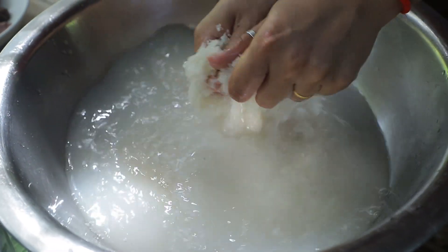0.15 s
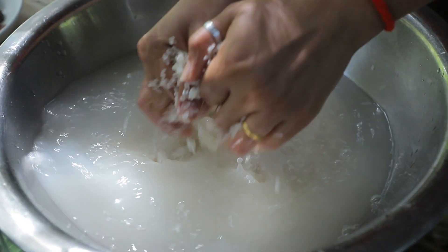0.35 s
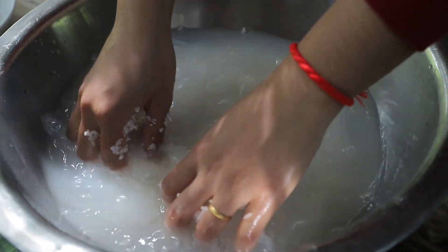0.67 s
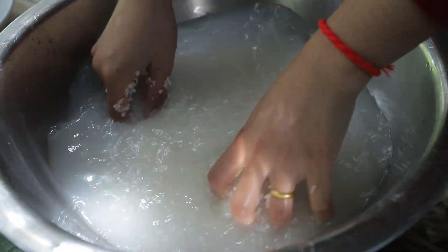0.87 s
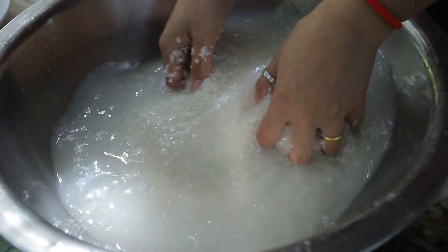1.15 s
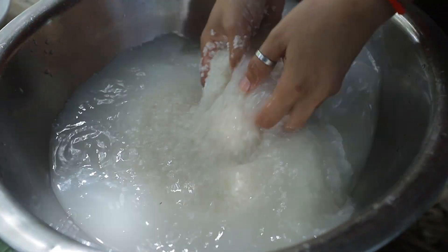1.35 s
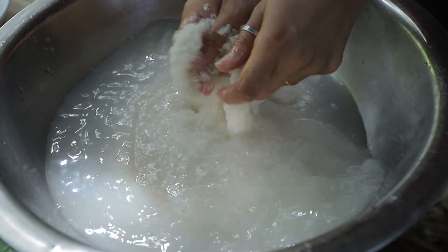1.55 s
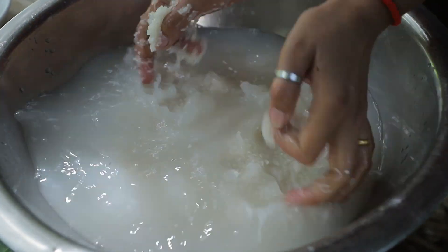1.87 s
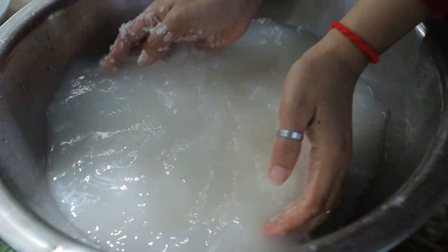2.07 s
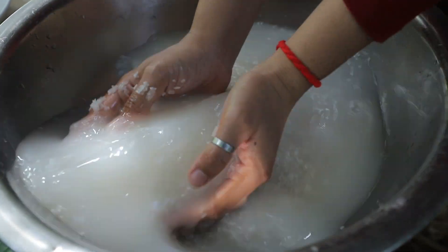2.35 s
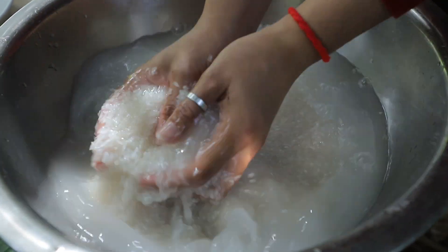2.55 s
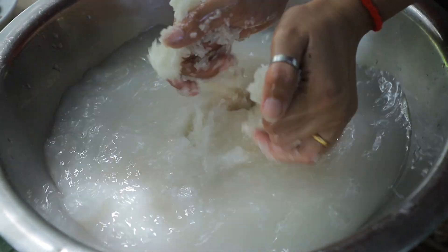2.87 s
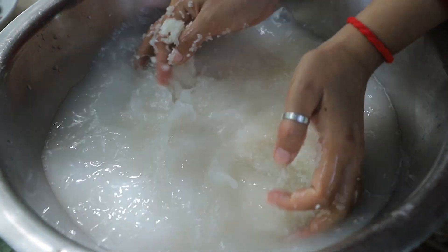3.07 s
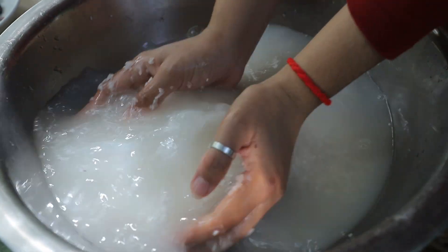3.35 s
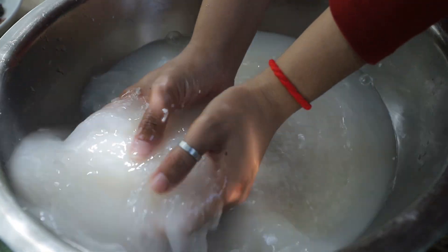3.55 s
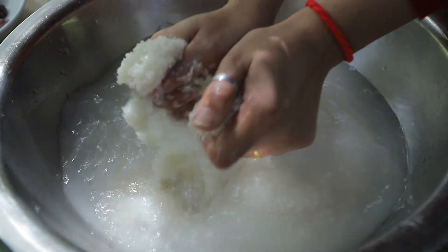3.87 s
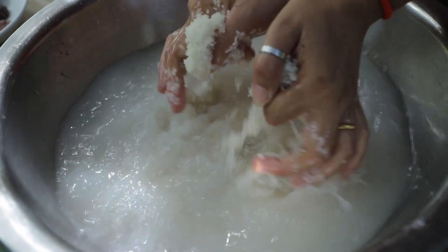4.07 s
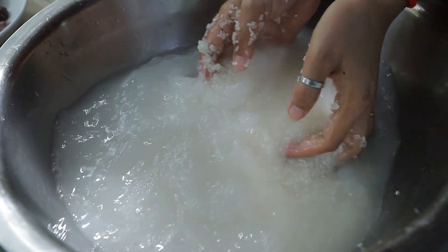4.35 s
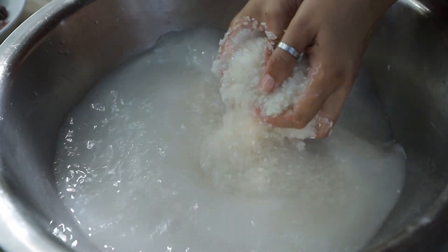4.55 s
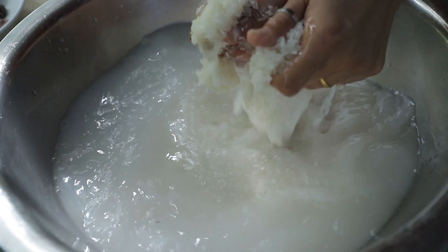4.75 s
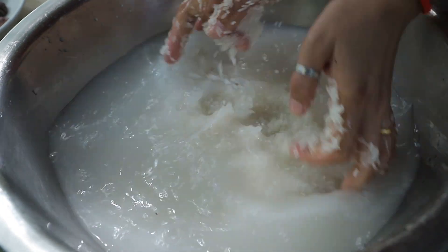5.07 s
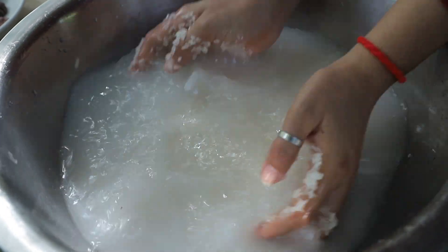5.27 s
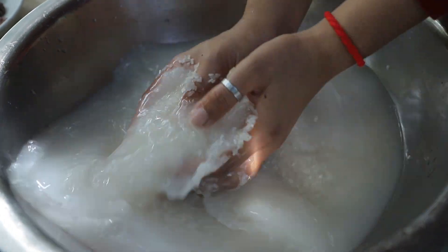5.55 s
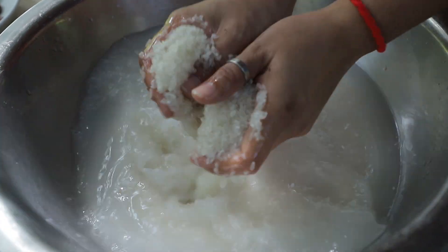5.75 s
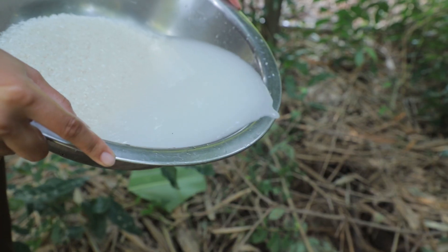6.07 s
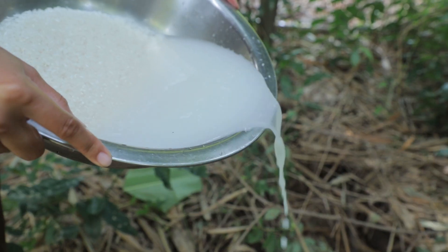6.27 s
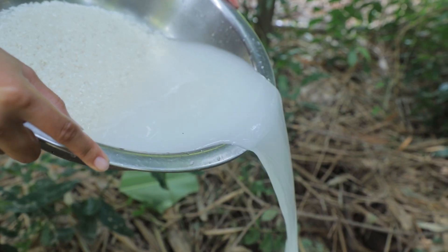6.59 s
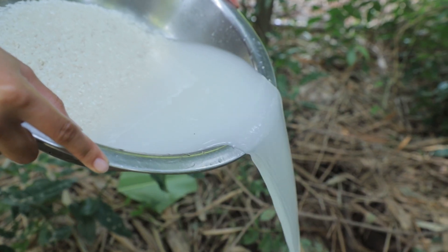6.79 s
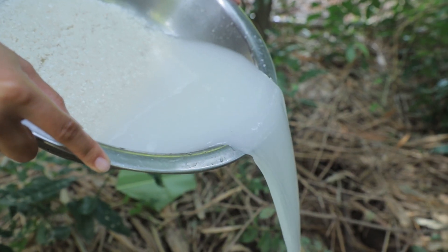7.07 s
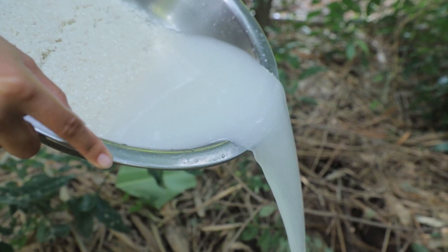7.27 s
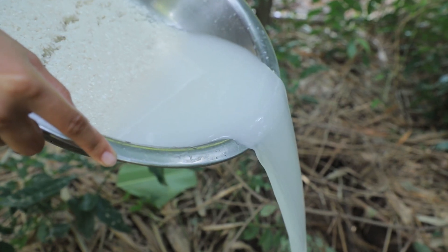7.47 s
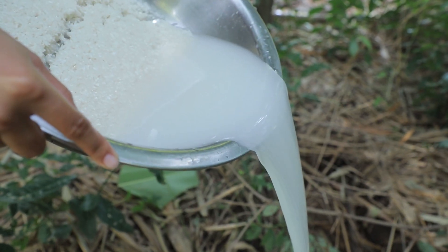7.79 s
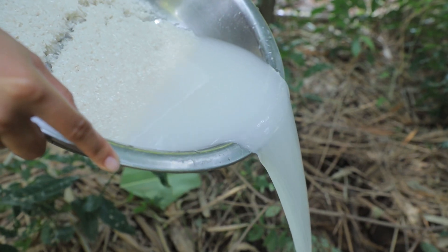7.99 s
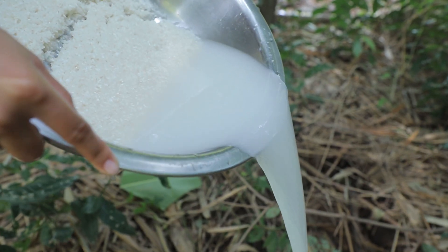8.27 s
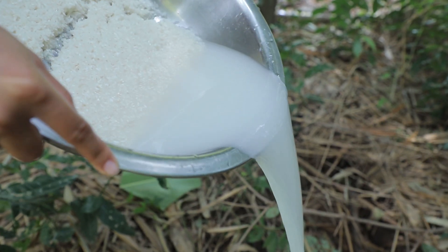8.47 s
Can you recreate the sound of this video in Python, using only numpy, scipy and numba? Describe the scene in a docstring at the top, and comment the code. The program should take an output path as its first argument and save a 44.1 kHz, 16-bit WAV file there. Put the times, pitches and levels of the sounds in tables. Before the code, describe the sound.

A close outdoor microphone hears hands washing raw rice in a metal bowl over airy hiss. From 0 to 0.8 s, gritty swishes and sharp watery snaps burst out, then settle to light rocking water. Another swish starts near 1.45 s, with a clear bubble plop at 1.55; churning continues through 2 s, with clustered bubbles around 2.6 and a strong splash near 3.1. The bowl gets a faint knock at 3.2 and a firmer, dull one at 3.65, amid plops and gurgles. Squeezing swishes follow at 4 and strongly around 5.1, easing before a last stir near 5.8. Low wind puffs bump the microphone from 3.2, strongest around 5 to 5.5. At 6 s there is a tiny near-silent gap, then a faint insect chirp. Pouring starts almost inaudibly, thickens from 6.7, and runs steadily on dry leaves until 8.6, with small drips, a brief distant low drone around 7 to 8 and softer gusts.

```python
"""Outdoors, hands stir and squeeze raw rice in a metal bowl of water, then pour the rinse water onto dry leaves.
Swishes are crowds of gliding bubble grains, clicks and band-passed spatter; single bubbles and smacks sit on top.
Two knocks ring the bowl's modes. After a brief near-silent cut the same water layers play the pour and one chirp.
Behind lie coloured air noise, gusts of low noise in puffs and a low drone; a microphone housing colours
the water, bubbles and air with peaks near 1.3, 3 and 5 kHz."""
import sys
import numpy as np
from scipy import signal
from scipy.fft import rfft, irfft
from scipy.io import wavfile
from scipy.ndimage import uniform_filter1d
from numba import njit

SR = 44100
rng = np.random.default_rng(int(sys.argv[2]) if len(sys.argv) > 2 else 0)


def inscribe(sig):
    """Save sig as 16-bit PCM at rate SR to the path in sys.argv[1].

    A 1-D sig is mono; a 2-D sig holds one channel per row.
    Samples are clipped to [-1, 1] before scaling.
    """
    pcm = np.round(np.clip(np.atleast_2d(sig).T, -1, 1) * 32767)
    wavfile.write(sys.argv[1], SR, pcm.astype(np.int16))


N = 380571  # length in samples

# The gap between stirring and pouring. The row: start in seconds, end in seconds.
CUT_S = (5.9886, 6.0206)
CUT_START_S, CUT_END_S = CUT_S

# Open air noise. Each row: frequency in Hz, relative level in dB per Hz.
AIR_SPECTRUM = [(25, 11.5), (60, 13), (110, 12), (200, 4), (500, 5.5), (1500, -6), (3000, -4),
                (5000, -13.5), (9000, -7.5), (15000, -24)]
AIR_DB = -42.5  # rms
# Colour of the microphone housing. Each row: frequency in Hz, gain in dB.
HOUSING = [(90, -18.5), (200, -16.5), (630, -17), (1050, -8.5), (1280, -1.5), (1480, -9), (1800, -14),
           (2900, -4), (4050, -3.5), (4800, 0), (5800, -3.5), (6800, -13.5), (10300, -17.5), (15500, -19)]
# A distant low drone that swells. The row: full level from in seconds, held in seconds, 10 dB rise in seconds,
# 10 dB fall in seconds, level in dB.
DRONE = (7, 1.1, 0.1, 0.3, -51)

# Gusts on the microphone. Each row: full level from in seconds, held in seconds, 10 dB rise in seconds,
# rumble in dB, flutter over rumble in dB. Signs of the times are ignored.
GUSTS = [(3.24, .02, 0.35, -38.5, -11.5), (3.5, .58, -0.1, -40, 1.5), (4.16, 0.14, -0.26, -32, -0.5),
         (4.45, .5, 0.5, -42.5, -0.5), (5.08, 0.041, 0.15, -29.5, 1.5), (5.42, 0.041, 0.08, -27.5, -1.5),
         (5.66, 0.33, -1.1, -32.5, -9.5), (7.55, .1, 0.23, -35, -18), (7.97, 0.11, 0.3, -35, -20)]
GUST_FALL_S = 0.084  # per 10 dB
# Light wind between gusts. The row: rumble in dB, flutter over rumble in dB.
BREEZE = (-61.5, 0.85)

# One faint chirp. The row: start in seconds, end in seconds, pitch in Hz, peak in dB.
CRICKET = (6.135, 6.235, 9550, -53)

# Modes of the water-damped bowl. Each row: pitch in Hz, level over the knock in dB, free 60 dB decay in seconds.
BOWL_MODES = [(345, -4, .08), (735, 0, .05), (1045, -5, .8)]
# Knuckles meet the bowl. Each row: time in seconds, level in dB, longest 60 dB decay under the hand in seconds.
KNOCKS = [(3.2214, -35, 0.89), (3.656, -24, .06)]

# Drops and grains that smack. Each row: time in seconds, body peak in dB, nominal pitch in Hz,
# bright spit over body peak in dB.
SMACKS = [(0.102, -21, 4170, -14), (0.1675, -16, 4400, -27), (0.316, -16, 6200, -28),
          (0.42, -11.5, 5670, -4), (0.471, -8.5, 4160, 3), (0.5324, -13.5, 4740, 1.5),
          (0.667, -9, 4460, -23), (0.691, -12.5, 4810, -3), (0.7484, -15.5, 4320, -23),
          (1.4516, -23, 7400, -9), (1.4628, -11.5, 4680, -6), (1.7233, -8.5, 6560, -10),
          (1.789, -10, 4400, -17), (1.869, -17, 7100, -20), (1.9706, -6, 5270, -11),
          (2.0028, -14.5, 5700, -14), (2.06, -7, 4620, -3), (2.149, -10.5, 5670, -10),
          (2.459, -19.5, 4700, -17.5), (2.632, -11.5, 7960, -23), (2.8581, -10.5, 3470, -18),
          (2.967, -16, 5040, 2.5), (2.995, -17, 4720, 2), (3.011, -4.5, 4900, -27), (3.068, -12, 5500, -13),
          (3.0778, -5, 5600, -5), (3.1124, -25, 5340, -26), (3.122, -8.5, 5760, -9),
          (3.1697, -11, 3850, -19), (3.197, -4, 5200, -19), (3.295, -12, 4470, -23),
          (3.3274, -11.5, 6270, -13), (3.37, -10, 5160, -8), (3.6267, -15.5, 7600, -14.5),
          (3.686, -17, 2700, -20), (3.7092, -10, 4930, -2.5), (4.02, -18, 4800, 1), (4.0624, -30, 6410, -5),
          (4.13, -8, 5760, -24), (4.157, -20, 4580, 5), (4.2455, -13.5, 8150, -1),
          (4.328, -4.5, 6140, -24.5), (4.9553, -9, 3580, 7), (5.036, -6, 3480, -5), (5.045, -16, 3830, -14),
          (5.063, -6, 5070, -0.5), (5.0926, -10, 4090, -14), (5.1617, -5, 6150, -6),
          (5.2355, -2, 5260, -22), (5.2638, -7.5, 5000, -8), (5.7375, -15, 4770, 7),
          (5.849, -11, 5130, -27), (6.4804, -30.5, 3580, -2), (6.6662, -28.5, 3590, -21),
          (6.7351, -22.5, 5060, -21), (7.0527, -17, 5130, -21), (8.023, -20, 4200, -20),
          (8.0747, -18, 4330, -24), (8.084, -15, 4870, -20), (8.219, -18.5, 4700, -20),
          (8.2585, -19, 5640, 1), (8.303, -17.5, 4500, -15), (8.355, -18, 4800, -15),
          (8.377, -22, 3300, -15), (8.5679, -22.5, 5030, 4)]
# Single bubbles. Each row: start in seconds, start pitch in Hz, pitch ratio after one length, length in ms,
# nominal peak as heard in dB.
BUBBLES = [(0.289, 2820, 1.02, 2.3, -20.5), (0.4096, 3400, 0.93, 2.6, -17.5), (0.435, 3030, 0.84, 2.5, -13),
           (0.442, 1264, 0.97, 2.9, -13.5), (0.4666, 3010, 1.02, 9.7, -19), (0.479, 960, 0.94, 8, -29.5),
           (0.573, 2800, 1.02, 2.8, -19.5), (0.6025, 996, 0.88, 4.7, -21), (0.668, 2300, 1.04, 4.8, -21.5),
           (1.4534, 1360, 0.99, 5, -21), (1.55, 1185, 0.99, 6.8, -2.5), (1.5664, 796, 1.24, 10.7, -22.5),
           (1.5863, 3010, 0.97, 3, -19.5), (1.617, 868, 1.06, 13, -30.5), (1.8162, 3860, 1.1, 4.4, -18),
           (1.8307, 3170, 1.03, 3.7, -15.5), (1.94, 1434, 1.16, 8.4, -28), (2.075, 1330, 1.07, 4.6, -21.5),
           (2.155, 2760, 1.08, 4.4, -20.5), (2.187, 3020, 1.06, 3, -5.5), (2.219, 3360, 0.96, 3.3, -19),
           (2.32, 1260, 1.1, 9.1, -30), (2.455, 2340, 1, 3.8, -27), (2.567, 1350, 1.2, 5.1, -28),
           (2.6162, 1007, 1.11, 6, -7.5), (2.629, 1310, 1.02, 2.7, -6.5), (2.637, 1345, 1.04, 5.8, -25),
           (2.648, 2750, 0.93, 7.5, -15), (2.649, 1070, 1, 4.5, -10.5), (2.658, 1146, 1.04, 12, -22),
           (2.7166, 3350, 0.97, 2.3, -15), (2.7298, 1285, 1.03, 4.8, -7), (2.7335, 821, 1.12, 18.5, -22.5),
           (2.735, 2280, 1.1, 6.2, -24), (2.771, 822, 1.11, 17.5, -17.5), (2.821, 1200, 1.07, 4.5, -24),
           (2.851, 1200, 0.92, 5, -20), (2.868, 940, 1.23, 7.5, -27.5), (2.896, 1290, 1.12, 4, -23),
           (3.0455, 1850, 1.01, 3, -14.5), (3.2194, 941, 1.18, 11.8, -9), (3.241, 1580, 0.94, 2.8, -16.5),
           (3.326, 1274, 0.98, 9, -24.5), (3.3687, 2760, 0.99, 2.8, -17.5), (3.482, 1290, 0.97, 6.4, -22.5),
           (3.6855, 1450, 1.3, 6.5, -26), (3.6973, 2550, 0.88, 5.3, -16.5),
           (3.7064, 2710, 1.01, 4.6, -10.5), (3.7072, 1280, 1.09, 7, -11), (3.7073, 992, 1.06, 13.5, -15.5),
           (3.728, 1310, 1.04, 23, -23), (3.748, 965, 1.2, 9.4, -21), (3.7578, 1190, 1.07, 9.8, -18.5),
           (3.784, 1000, 1.01, 8, -23), (3.788, 1360, 0.97, 9.4, -19), (3.8028, 870, 1.05, 6.2, -21),
           (3.805, 1250, 0.98, 4.9, -18), (3.8371, 1190, 0.93, 4.6, -8), (3.862, 516, 1.36, 20, -29.5),
           (3.864, 803, 1.15, 13.7, -25), (3.918, 1045, 1.07, 6.5, -23.5), (3.969, 1316, 0.94, 9.3, -18),
           (4.0638, 2940, 1.0, 4.6, -19.5), (4.2112, 3120, 0.92, 2.6, -6.5), (4.2124, 3430, 1.09, 5.4, -17),
           (4.2326, 2340, 0.97, 2.4, -15), (4.3235, 2930, 0.84, 5.2, -19.5),
           (4.3305, 1840, 1.03, 3.4, -17.5), (4.519, 1325, 0.97, 5.5, -24.5),
           (4.7097, 703, 1.23, 11.4, -20.5), (4.7216, 1630, 1.08, 8.2, -22), (4.9537, 3670, 0.91, 3.9, -16),
           (5.061, 2274, 0.96, 4.8, -14), (5.1437, 2050, 0.95, 7.3, -17), (5.1574, 3090, 0.99, 4.8, -11.5),
           (5.1825, 2120, 1.16, 2.7, -16), (5.1882, 4300, 0.96, 4.7, -15.5),
           (5.2255, 1691, 0.99, 1.9, -16.5), (5.235, 3220, 0.95, 1.8, -14), (5.241, 2590, 1.07, 2.8, -12),
           (5.262, 1355, 1.06, 8.5, -21.5), (5.6607, 1375, 0.93, 8.5, -18), (5.698, 1310, 0.97, 8, -32),
           (5.728, 2900, 1.03, 4, -20), (5.738, 3040, 0.91, 4.4, -18.5), (5.765, 2650, 1.05, 8.2, -21),
           (5.788, 1480, 0.99, 7, -28), (5.82, 1160, 0.83, 7.9, -30), (5.868, 2420, 1.07, 8, -25),
           (5.8863, 1327, 1.1, 12, -21.5), (5.9116, 3880, 1.03, 4.8, -24), (6.64, 400, 0.92, 23, -43.5),
           (6.781, 2440, 0.7, 9.2, -34)]
BUBBLE_ROUGH = 0.16  # rms depth to which the churning surface shakes a bubble's ring
ECHO_DB, ECHO_T60_S = -12.5, 0.087  # sound scatters between the water and the bowl's wall

# Hands lift, squeeze and plunge the rice. Each row: full level from in seconds, held in seconds,
# 10 dB rise in seconds, 10 dB fall in seconds, fizz in dB, spray over fizz in dB, gurgle in dB.
# Signs of the times are ignored; fizz levels here and below are set before a common lift.
SWISHES = [(0.16, 0.24, 3, 0.8, -42.5, 2, -55), (0.45, 0.035, -0.17, 0.13, -29, -3, -40),
           (0.6, 0.092, -0.2, 0.12, -31, -5.5, -51), (1.46, 0.01, 0.25, -0.6, -37, -12, -45),
           (1.58, .03, -0.2, 0.7, -37, -24, -44.5), (1.74, 0.19, 0.07, -0.11, -33, 1.5, -48),
           (1.96, 0.11, -0.08, 0.37, -32, -1.5, -59), (2.62, 0.14, 0.07, 0.17, -30, -6.5, -37),
           (3.0, 0.074, 0.07, 0.12, -27.5, -2.5, -49), (3.179, 0.022, -0.04, 0, -23, 0, -50),
           (3.25, 0.085, 0.33, 0.16, -35, -7, -46), (3.489, 0.011, 0, -0.4, -36.5, -9.5, -48),
           (3.703, 0.09, -0.15, 0.16, -27.5, -17, -35.5), (3.8, 0.15, -0.44, 0.24, -38, 0, -38),
           (4.03, 0.32, 0, 0.05, -33, 1, -60), (4.4, 0.14, 1.3, 0.9, -37.5, -11.5, -51),
           (5.04, 0.17, 0.18, 0.16, -26, -2, -38.5), (5.731, 0.055, 0.26, 0, -36.5, -15, -39),
           (5.85, 0.094, 0.45, 0, -34.5, -4.5, -41)]
# Water rocking between swishes. The row: fizz in dB, spray over fizz in dB, gurgle in dB.
SETTLING = (-43.5, -11, -50.5)
# The poured stream thickens and lands on leaves. Each row: time in seconds, fizz in dB, spray over fizz in dB,
# gurgle in dB.
POUR = [(6.02, -54, -8, -50), (6.63, -58.5, 4, -45.5), (6.76, -45, -3, -44.5), (6.87, -43, -4, -49),
        (6.91, -39, -1, -42), (7.13, -36.5, -0.5, -36.5), (7.22, -41.5, 2, -41.5),
        (7.38, -38.5, 1.5, -35.5), (7.67, -38.5, -2, -40), (8.62, -37, -0.5, -38)]
# How lumpy the water sounds, as factors on grain scatter. The row: settling, stirred with rice, smooth poured sheet.
GRIT = (0.67, 1, 0.58)
FIZZ_LIFT_DB = 0.5  # raises fizz and spray alike
POUR_BUBBLES_DB = -3.5  # the poured sheet traps less air than stirring hands

EDGE_HZ, TOP_HZ = 15750, 16750  # where the treble steps down, and where it ends


def undb(db):
    """Gain of a level in dB."""
    return 10 ** (np.asarray(db) / 20)


def level(x, db):
    """Scaled to an rms level in dB."""
    return x * undb(db) / np.sqrt(np.mean(x ** 2))


def band(x, lo_hz, hi_hz, order=2):
    """Band-pass."""
    return signal.sosfilt(signal.butter(order, [lo_hz, min(hi_hz, .45 * SR)], "band", fs=SR, output="sos"), x)


def read_spectrum(table, hz):
    """dB of a spectrum table at given frequencies, straight lines over log frequency."""
    at_hz, db = np.transpose(table)
    return np.interp(np.log(hz), np.log(at_hz), db)


def colour(x, table):
    """Minimum-phase filter with the gain of a spectrum table, so nothing rings early."""
    size = 2048
    hz = np.maximum(np.arange(size // 2 + 1), 1) * SR / size
    cepstrum = irfft(np.log(undb(read_spectrum(table, hz))))
    # folding the cepstrum onto positive time makes the filter causal
    cepstrum[1:size // 2] *= 2
    cepstrum[size // 2 + 1:] = 0
    impulse = irfft(np.exp(rfft(cepstrum)))
    return signal.fftconvolve(x, impulse)[:N]


def swells(start, hold, rise, fall):
    """Power envelopes, one per event: rise, hold, fall, each kept to its own side of the cut."""
    t = np.arange(0, N, 32) / SR  # a coarse grid is enough
    start = np.reshape(start, (-1, 1))
    hold, rise, fall = (np.reshape(np.abs(v), (-1, 1)) for v in (hold, rise, fall))
    before = (start - t) / rise
    after = (t - start - hold) / fall
    tens_of_db_down = np.maximum(np.maximum(before, after), 0)
    same_side = (start < CUT_END_S) == (t < CUT_END_S)
    return 10 ** -tens_of_db_down * same_side


def total_db(shapes, db, rest_db):
    """Level at every sample of events that add in power over a resting level."""
    power = undb(db) ** 2 @ shapes + undb(rest_db) ** 2
    return np.interp(np.arange(N), np.linspace(0, N, len(power)), 10 * np.log10(power))


def open_air():
    """Steady broadband air: coloured noise heard through the housing."""
    noise = colour(rng.standard_normal(N), AIR_SPECTRUM)
    return level(colour(noise, HOUSING), AIR_DB)


def drone():
    """A far, low band of noise that swells during the pour."""
    *shape, db = DRONE
    noise = level(band(rng.standard_normal(N), 110, 540), 0)
    return undb(total_db(swells(*shape), [db], db - 30)) * noise


def gusts():
    """Rumble level and flutter over rumble: gusts add in power over a light breeze."""
    start, hold, rise, rumble_db, flutter_db = np.transpose(GUSTS)
    shapes = swells(start, hold, rise, GUST_FALL_S)
    rumble = total_db(shapes, rumble_db, BREEZE[0])
    flutter = total_db(shapes, rumble_db + flutter_db, BREEZE[0] + BREEZE[1])
    return rumble, flutter - rumble


def wind(rumble_db, flutter_db):
    """Turbulence at the microphone port: slow rumble and a quicker flutter, both in uneven puffs."""
    rumble, flutter, puffs = rng.standard_normal((3, N))
    puff_db = 2.2 * level(band(puffs, 3.2, 4.5, order=1), 0)
    eddies = level(band(rumble, 13.2, 44.0, order=3), 0)
    eddies += undb(flutter_db) * level(band(flutter, 39.7, 87.0), 0)
    return undb(rumble_db + puff_db) * eddies


def cricket():
    """One faint chirp: a high sine throbbing 38 times a second."""
    start, end, hz, db = CRICKET
    t = np.arange(N) / SR
    throb = np.sin(np.pi * 38 * (t - start)) ** 2
    return undb(db) * ((t > start) & (t < end)) * throb * np.sin(2 * np.pi * hz * t)


def bowl(s, db, hand_t60):
    """One knock: the water-damped bowl rings in its modes, a hand on the metal shortening the decay."""
    t = np.maximum(np.arange(N) / SR - s, 0)
    out = np.zeros(N)
    for hz, mode_db, free_t60 in BOWL_MODES:
        fade = undb(db + mode_db - 60 * t / min(free_t60, hand_t60))
        out += fade * np.sin(2 * np.pi * hz * t)
    return out


def smacks():
    """Drops and grains snap as short noise: a body, a briefer bright spit and a faint tail on both."""
    size = 2048
    out = np.zeros(N)
    t = np.arange(size) / SR - .003  # the swell starts just before the snap
    swell = np.exp(np.minimum(t - .0006, 0) / 0.00062)
    tail = 0.16 * np.exp(-t / 0.011)
    body_fade = np.exp(-np.maximum(t, 0) / 0.0016)
    spit_fade = np.exp(-np.maximum(t, 0) / 0.00036)
    for s, db, hz, spit_db in SMACKS:
        noise = rng.standard_normal(size)
        body = band(noise, 0.7 * hz, 1.323 * hz) * swell * (body_fade + tail)
        spit = band(noise, 10400, 16100) * swell * (spit_fade + tail)
        snap = body / np.abs(body).max() + undb(spit_db) * spit / np.abs(spit).max()
        i = int((s + t[0]) * SR)
        out[i:i + size] += undb(db) * snap[:N - i]
    return out


@njit
def ring(out, start, hz, ratio, length, gain, rise, fall):
    """Gliding sine grains: a quick rise, then a fade that steepens, reaching exp(-fall) at each length."""
    for k in range(len(start)):
        phase, i0 = 0., int(start[k])
        for i in range(min(int(length[k] * np.sqrt(6 / fall)), len(out) - i0)):
            u = i / length[k]
            phase += 2 * np.pi * hz[k] * ratio[k] ** min(u, 1.5) / SR
            attack = 1 - np.exp(-i / (rise * length[k]))
            out[i0 + i] += gain[k] * attack * np.exp(-fall * u * u) * np.sin(phase)
    return out


def bubbles():
    """Trapped air pockets ring as short sines gliding up or down, roughened by the churning surface."""
    s, hz, ratio, ms, db = np.transpose(BUBBLES)
    # peaks are as heard, so the housing's gain at each mid pitch is taken off first
    gain = undb(db - read_spectrum(HOUSING, hz * np.sqrt(ratio)))
    shake = 1 + BUBBLE_ROUGH * level(band(rng.standard_normal(N), 65, 910), 0)
    rings = ring(np.zeros(N), s * SR, hz, ratio, ms * SR / 1000, gain, 0.03, 0.51)
    return colour(shake * rings, HOUSING)


def scattered(x):
    """Adds a short, dull diffuse tail inside the bowl."""
    t = np.arange(SR // 4) / SR
    tail = band(rng.standard_normal(len(t)), 690, 5800, order=1) * undb(-60 * t / ECHO_T60_S)
    return x + undb(ECHO_DB) * signal.fftconvolve(x, tail / np.linalg.norm(tail))[:N]


def lumps(when, loud, scatter_db):
    """Gains of random grains: a few stand far above the rest, most of all while the hands stir."""
    settling, stirred, poured = GRIT
    stir = np.sqrt(swells(*np.transpose(SWISHES)[:4]).max(axis=0))
    in_bowl = settling + (stirred - settling) * stir[(when * len(stir)).astype(int)]
    grit = np.where(when * N < CUT_START_S * SR, in_bowl, poured)
    return undb(grit * scatter_db * np.minimum(-np.log(1 - loud), 4.0))


def swarm(count, lo_hz, hi_hz, cycles, glide, scatter_db):
    """Bubbles at random times and sizes, each gliding upward, the longest-lived the most."""
    when, size, last, loud = rng.random((count, 4)).T
    hz = lo_hz * (hi_hz / lo_hz) ** size
    length = cycles * (.5 + last) * SR / hz
    air_gain = np.where(when * N < CUT_END_S * SR, 1, undb(POUR_BUBBLES_DB))
    gain = lumps(when, loud, scatter_db) * air_gain
    return ring(np.zeros(N), when * (N - 1), hz, 1 + glide * last, length, gain, 0.1, 0.59)


def bursts(count, ms, scatter_db):
    """Envelope of random spatters that swell and die within a few ms."""
    when, loud = rng.random((count, 2)).T
    hits = np.bincount((when * N).astype(int), lumps(when, loud, scatter_db) ** 2, N)
    keep = np.exp(-1000 / (ms * SR))
    power = signal.lfilter([1], [1, -2 * keep, keep ** 2], hits)
    return level(np.sqrt(power), 0)


def ticks(count, scatter_db):
    """Grains and droplets strike as bare clicks of either sign."""
    when, loud, sign = rng.random((count, 3)).T
    return np.bincount((when * N).astype(int), lumps(when, loud, scatter_db) * np.sign(sign - .5), N)


def heard(x):
    """Through the microphone housing, at unit level on each side of the cut."""
    y, cut = colour(x, HOUSING), int(CUT_END_S * SR)
    return np.concatenate([level(y[:cut], 0), level(y[cut:], 0)])


def curves(table):
    """Columns of a curve table at every sample."""
    s, *columns = np.transpose(table)
    return [np.interp(np.arange(N) / SR, s, c) for c in columns]


def motion():
    """Fizz, spray over fizz and gurgle levels: swishes over settling water, then the pour."""
    start, hold, rise, fall, fizz_db, spray_db, gurgle_db = np.transpose(SWISHES)
    rest_fizz, rest_spray, rest_gurgle = SETTLING
    shapes = swells(start, hold, rise, fall)
    fizz = total_db(shapes, fizz_db, rest_fizz)
    spray = total_db(shapes, fizz_db + spray_db, rest_fizz + rest_spray) - fizz
    gurgle = total_db(shapes, gurgle_db, rest_gurgle)
    return np.where(np.arange(N) < CUT_END_S * SR, (fizz, spray, gurgle), curves(POUR))


def water(fizz_db, spray_db, gurgle_db):
    """Moving water: small bubbles, ticks and spatter hiss, fine spray on top, larger bubbles under."""
    spatter = bursts(count=2600, ms=0.99, scatter_db=3.5)
    hiss = rng.standard_normal((4, N))

    fizz = level(swarm(count=9000, lo_hz=1945, hi_hz=7690, cycles=7.1, glide=0.15, scatter_db=5.0), -1.9)
    fizz += level(band(hiss[0], 1560, 6800) * (0.36 + spatter), -4)
    fizz += level(band(ticks(count=2400, scatter_db=4.0), 2300, 11000, order=1), -7.5)

    fine = bursts(count=1500, ms=0.32, scatter_db=5.0)
    spiky = bursts(count=1500, ms=0.46, scatter_db=9.0)
    spray = band(hiss[1], 6800, 9170) * (0.65 + 0.32 * spatter + 0.85 * fine)
    spray += band(hiss[2], 8150, 16200) * (0.27 + 0.77 * spatter + 1.18 * spiky)

    gurgle = level(swarm(count=1800, lo_hz=659.0, hi_hz=1808, cycles=8.0, glide=0.154, scatter_db=4.0), 2.9)
    gurgle += level(band(hiss[3], 154, 2030) * (0.5 + 0.25 * spatter), 2.7)

    bright = heard(fizz) + undb(spray_db) * heard(spray)
    return undb(fizz_db + FIZZ_LIFT_DB) * bright + undb(gurgle_db) * heard(gurgle)


def scene():
    """Water, bubbles, smacks and the bowl over open air, wind, drone and a chirp."""
    background = open_air() + drone() + wind(*gusts()) + cricket()
    metal = sum(bowl(*knock) for knock in KNOCKS)
    details = scattered(bubbles() + smacks())
    return (background + metal + details + water(*motion()))[None]


def record(dry):
    """Dips 38 dB in the cut; the extreme treble steps down, then is removed."""
    t = np.arange(N) / SR
    gate = np.where((t > CUT_START_S) & (t < CUT_END_S), undb(-38), 1)
    gated = dry * uniform_filter1d(gate, size=64)  # softened edges
    stepped = signal.sosfilt(signal.ellip(8, .2, 24, EDGE_HZ, fs=SR, output="sos"), gated)
    return signal.sosfilt(signal.ellip(10, .2, 60, TOP_HZ, fs=SR, output="sos"), stepped)


dry = scene()
out = record(dry)
inscribe(out)
```